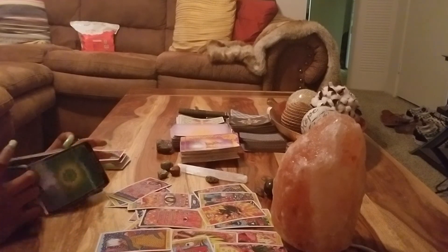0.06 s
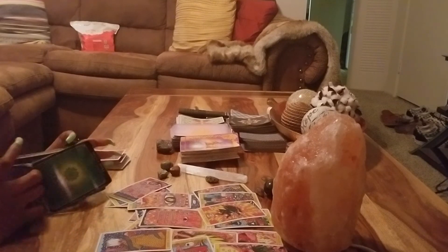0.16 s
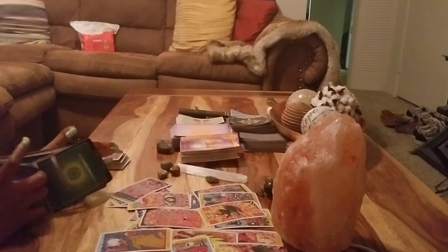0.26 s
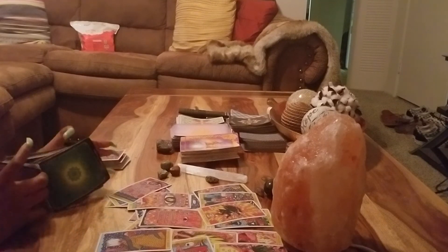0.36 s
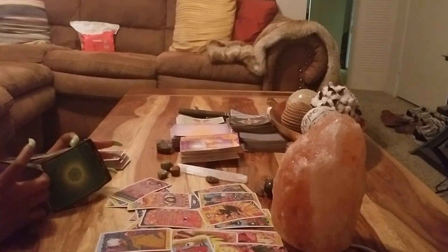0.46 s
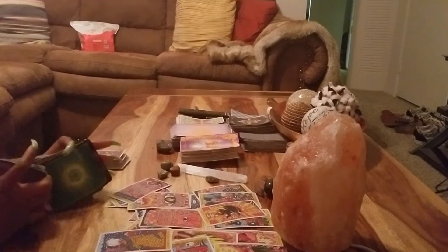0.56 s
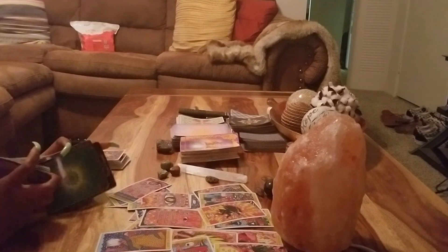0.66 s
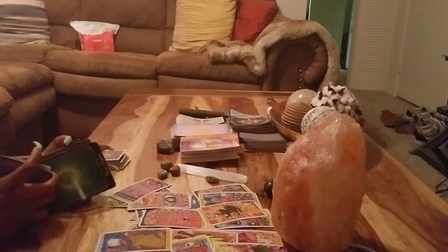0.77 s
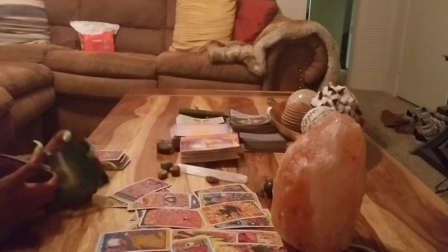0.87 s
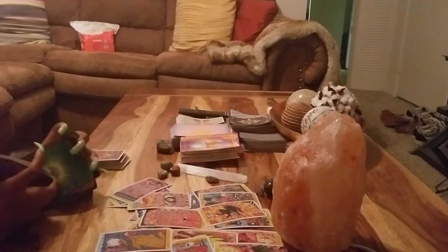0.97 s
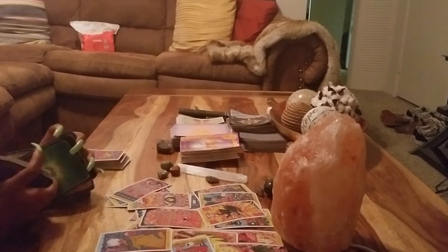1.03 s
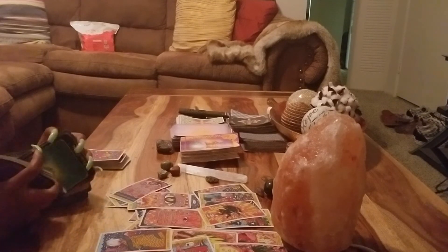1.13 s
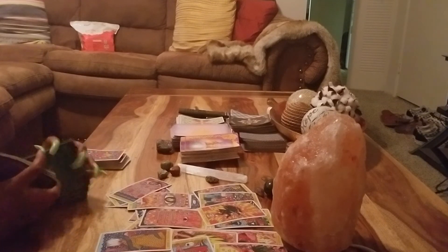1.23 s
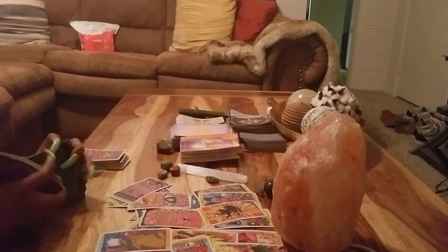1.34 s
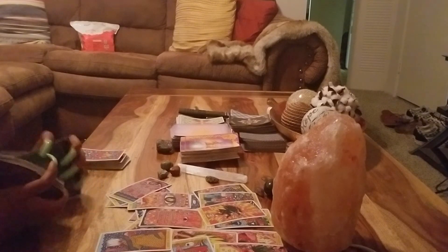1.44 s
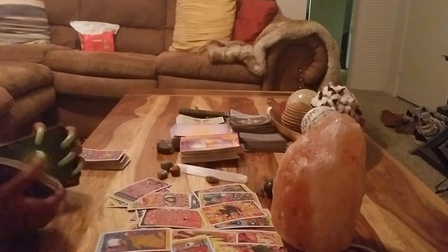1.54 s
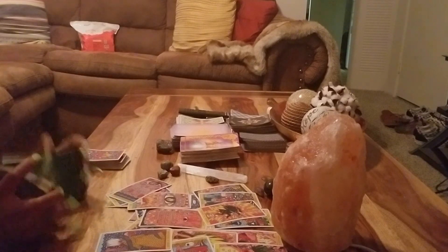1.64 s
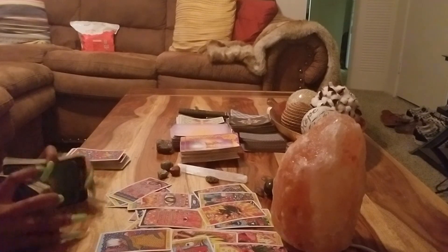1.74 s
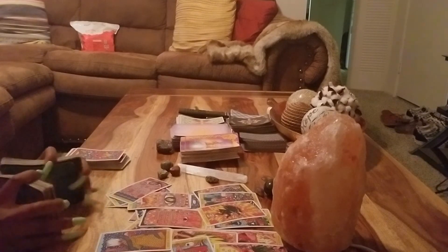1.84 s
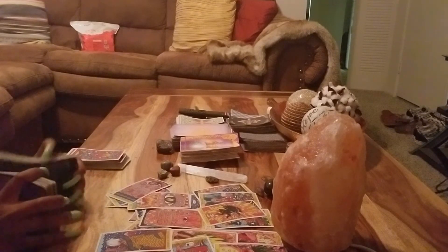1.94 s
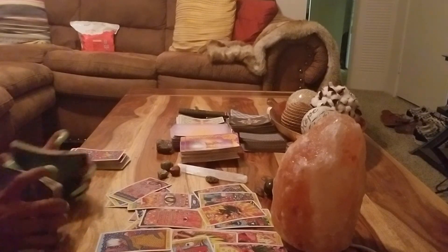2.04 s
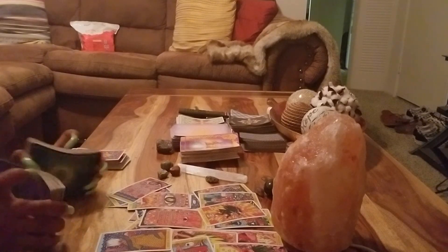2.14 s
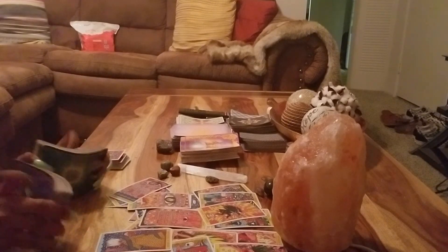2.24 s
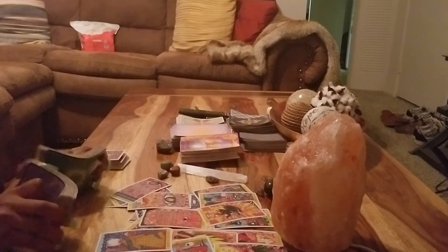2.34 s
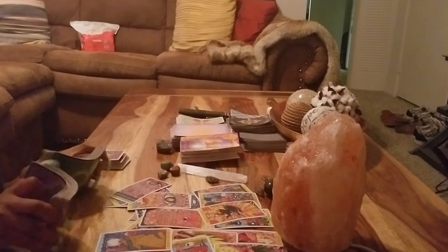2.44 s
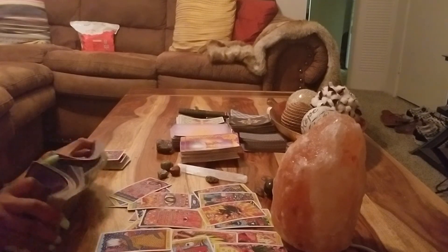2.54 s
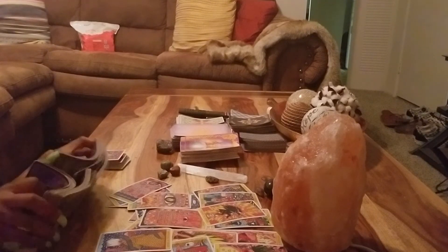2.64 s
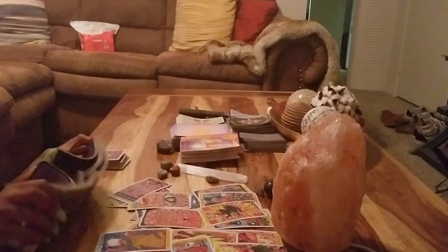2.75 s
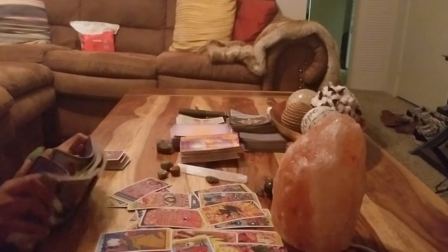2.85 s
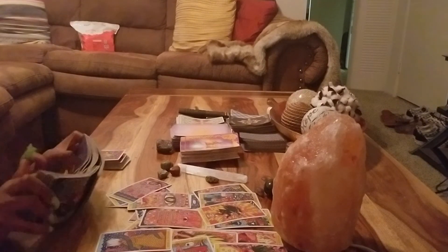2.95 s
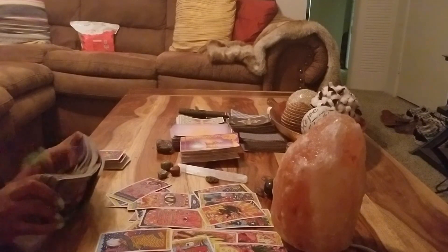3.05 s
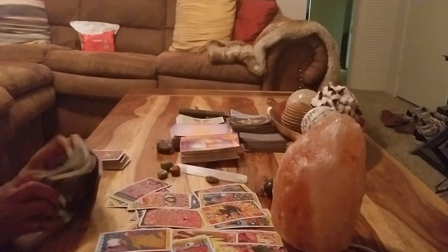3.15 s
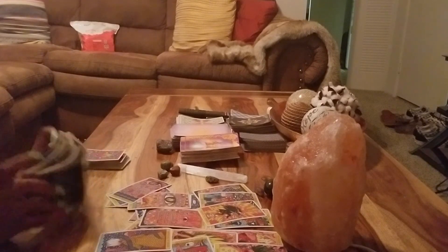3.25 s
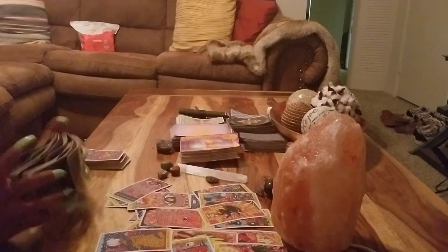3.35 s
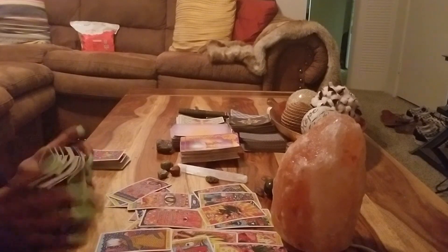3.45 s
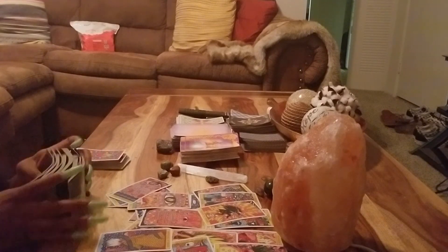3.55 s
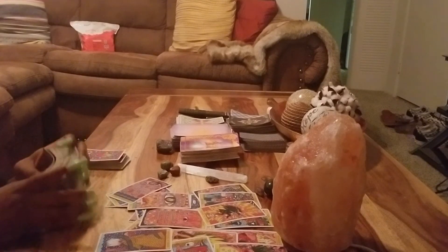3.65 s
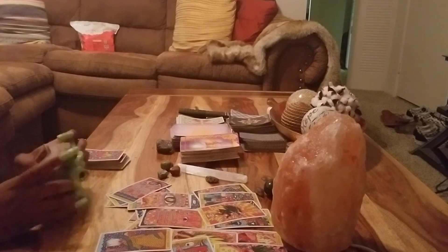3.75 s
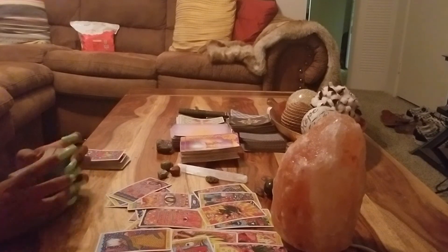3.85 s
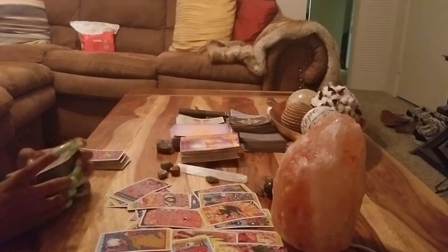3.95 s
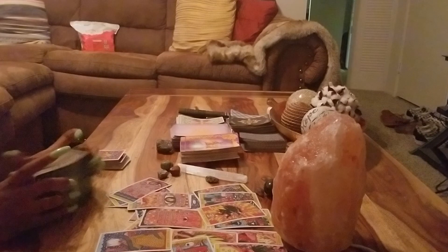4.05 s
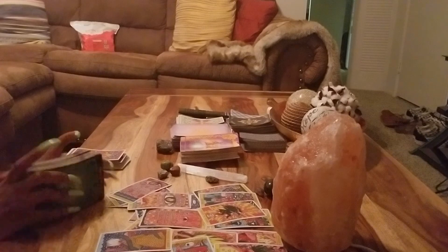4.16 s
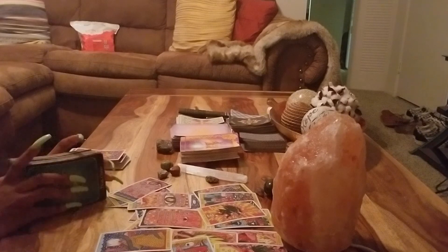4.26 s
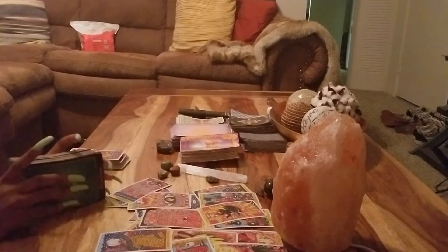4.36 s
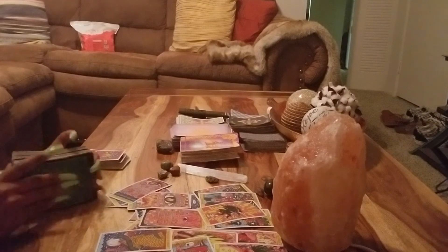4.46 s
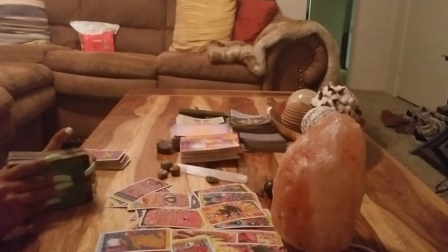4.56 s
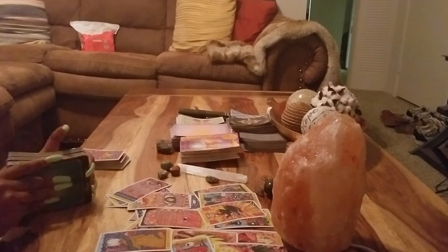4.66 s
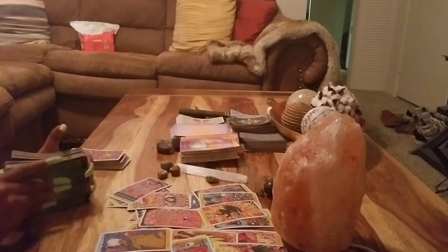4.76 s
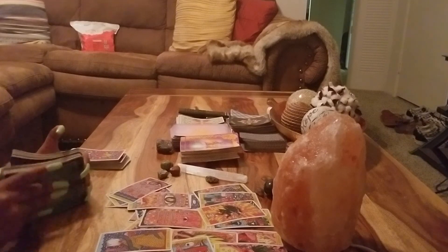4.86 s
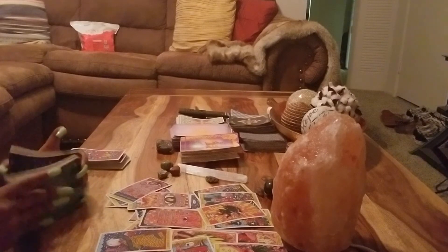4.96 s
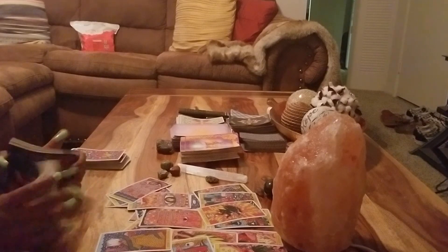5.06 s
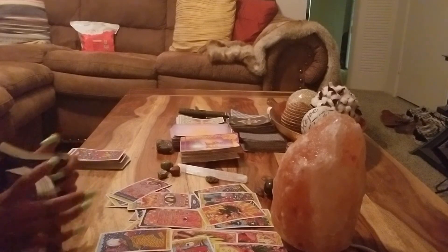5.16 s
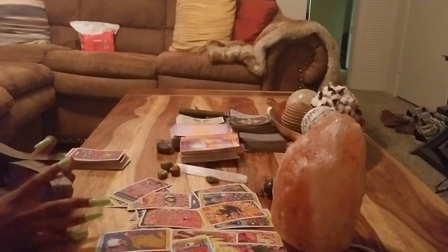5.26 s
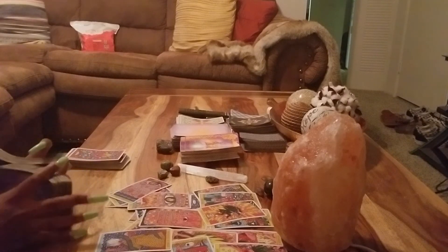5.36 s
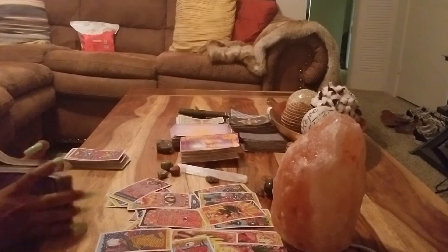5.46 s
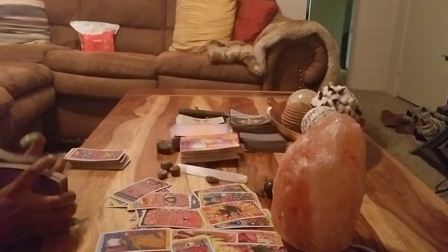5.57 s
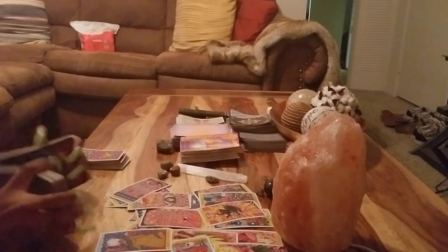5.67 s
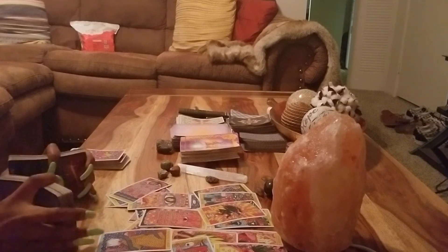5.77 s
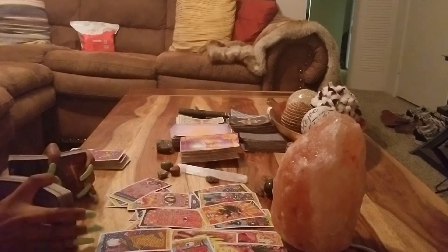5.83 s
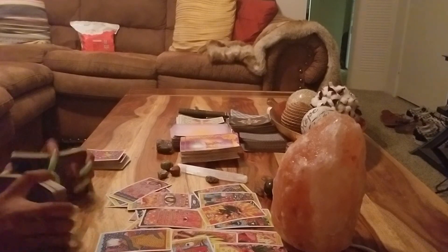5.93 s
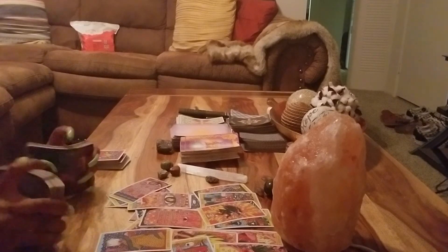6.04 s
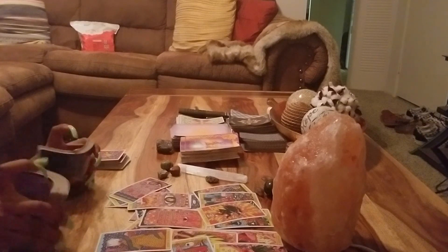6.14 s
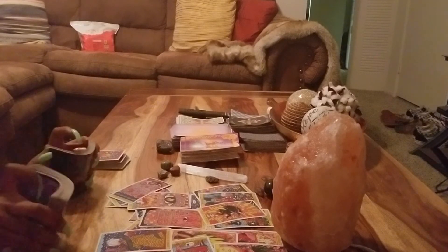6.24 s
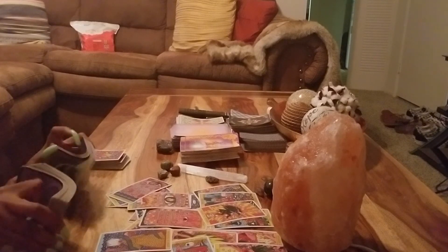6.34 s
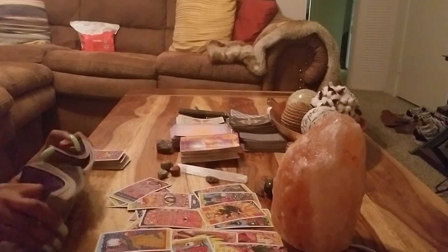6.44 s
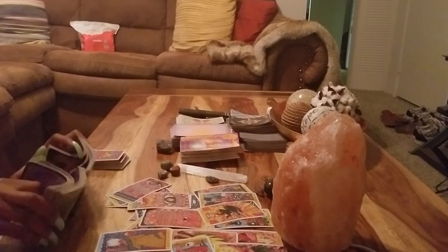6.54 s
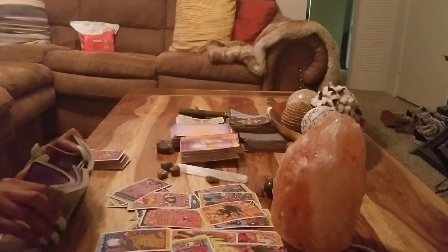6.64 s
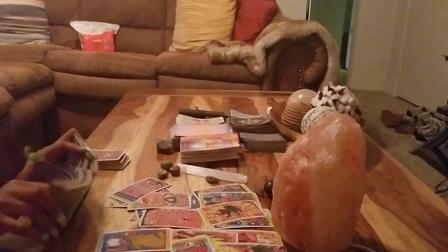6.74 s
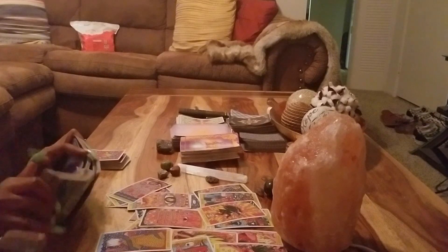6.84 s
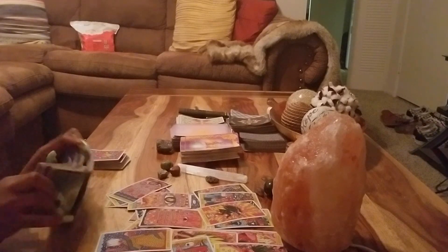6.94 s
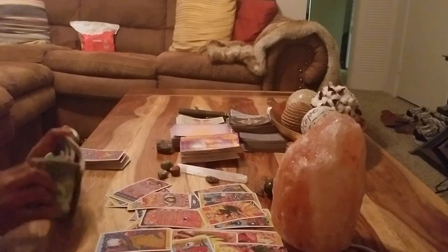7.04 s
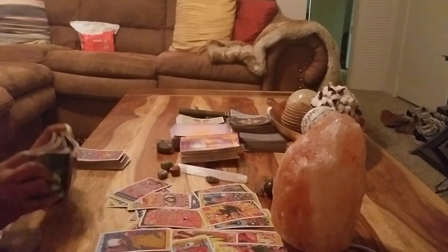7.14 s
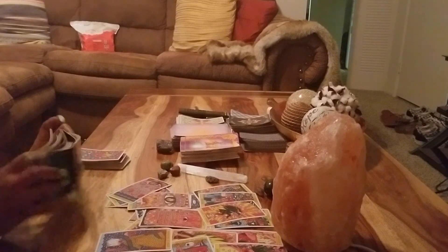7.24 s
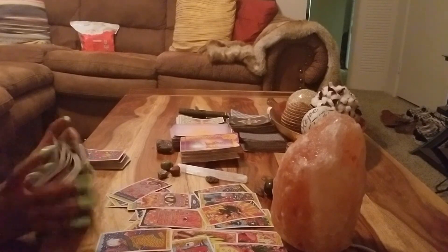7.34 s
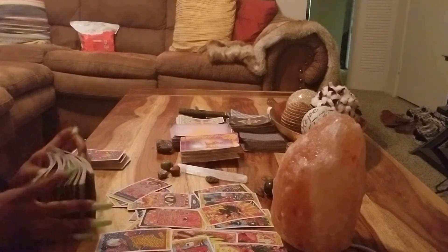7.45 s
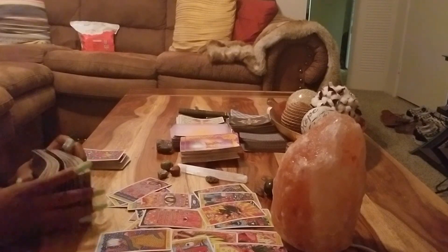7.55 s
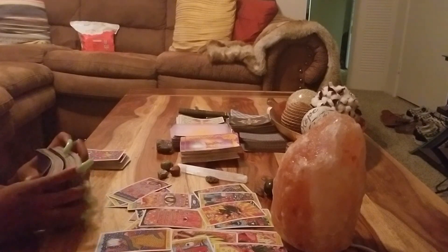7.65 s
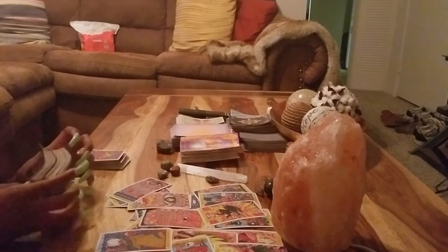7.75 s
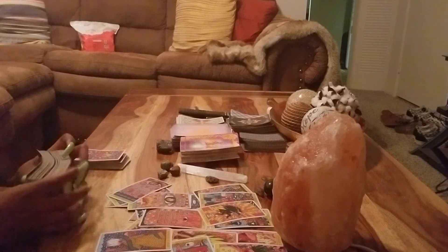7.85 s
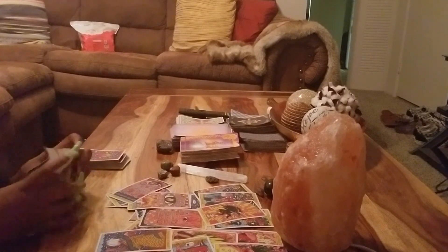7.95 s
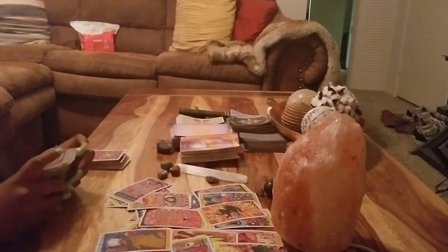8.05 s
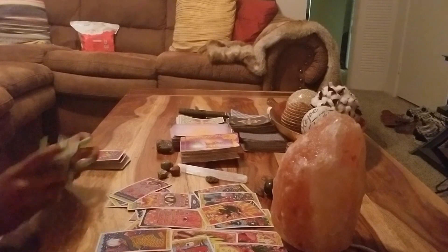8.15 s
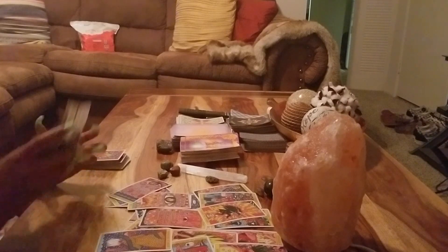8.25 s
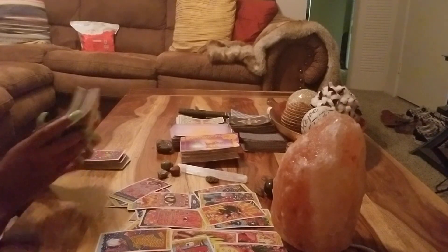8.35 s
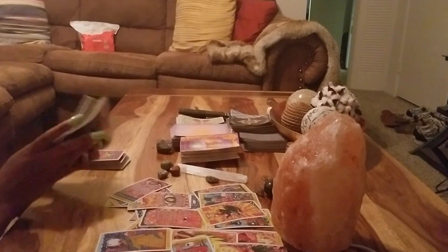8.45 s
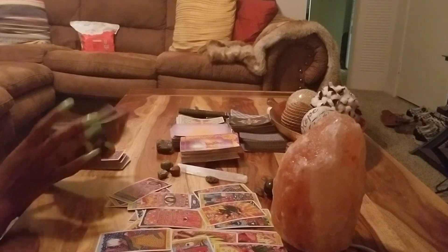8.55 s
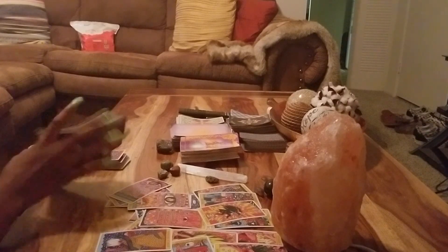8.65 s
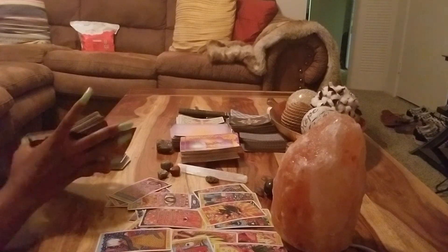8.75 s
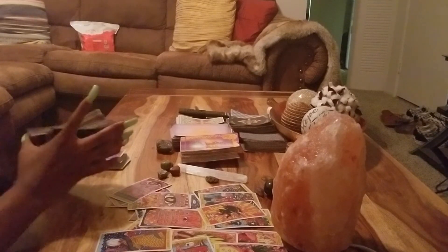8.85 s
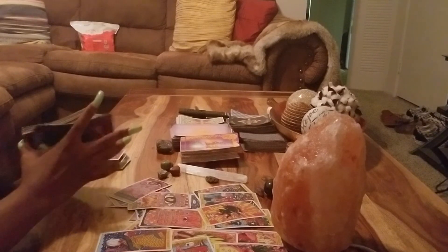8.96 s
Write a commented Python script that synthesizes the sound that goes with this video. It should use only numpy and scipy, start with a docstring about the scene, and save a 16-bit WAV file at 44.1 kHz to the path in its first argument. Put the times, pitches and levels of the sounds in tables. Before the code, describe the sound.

In a small, softly echoing living room, stiff cards are shuffled close to a stereo microphone over a low steady machine hum, a very faint high whine and still air. From 0 to 1.5 seconds faces rub softly with small ticks and dull pats. At about 1.65 a firm, bright slap lands as the deck is cut. From 2.4 to 2.95 a loud riffle snaps off the thumbs in uneven packets, crackling and thumping with a rustle. A firm slap at 3.4 and a duller one at 3.8 follow, amid sliding and clicks until about 5.5. Light slaps come near 5.7. A second riffle, generally thinner and crisper, with one strong early crack, runs from 6.2 to 6.75. Rubbing resumes, paired slaps land around 7.35, a papery scuff with bright ticks comes near 7.9, and faint slides and clicks fade toward 9.

```python
"""A deck of stiff cards is cut, riffled twice and squared up by hand over a wooden table, heard close up.
Cards snap off the thumbs in uneven packets, halves slap together, edges tick: each contact is a burst of
tiny noise impacts driving a resonant body. Faces slide as swelling noise peppered with small catches.
A small living room answers with early echoes and a soft tail, over a low steady hum, whine and still air."""
import sys
import numpy as np
from scipy import signal
from scipy.fft import rfft, irfft
from scipy.io import wavfile
from scipy.ndimage import uniform_filter1d

SR = 44100
rng = np.random.default_rng(int(sys.argv[2]) if len(sys.argv) > 2 else 0)


def digitize_waveform(pressure):
    """Quantize a signal to 16-bit integers and store it at the path in sys.argv[1].

    Rows of a 2-D input are taken as channels; values are limited to [-1, 1].
    """
    field = np.atleast_2d(pressure).T
    bounded = np.clip(field, -1, 1)
    quanta = np.round(bounded * 32767).astype(np.int16)
    wavfile.write(sys.argv[1], SR, quanta)


N = 396900  # samples, 9 s


def amp(db):
    """Decibels as a gain."""
    return 10 ** (np.asarray(db) / 20)


def evened(x):
    """The signal at an rms of one."""
    return x / np.sqrt(np.mean(x ** 2) + 1e-20)


def read(points, hz):
    """A spectrum joined by straight lines on a log-frequency axis."""
    f, value = np.transpose(points)
    return np.interp(np.log(hz + 1), np.log(f + 1), value)


def follow(points):
    """A level curve in dB as a gain for every sample."""
    return amp(np.interp(np.arange(N) / SR, *np.transpose(points)))


def add(mix, s, sound):
    """Mixes a sound in at time s."""
    part = mix[:, round(s * SR):][:, :sound.shape[1]]
    part += sound[:, :part.shape[1]]


def pair(x, likeness):
    """Blends two unrelated signals into a left and right as alike at each frequency as the table asks."""
    a, b = rfft(x)
    same = np.clip(read(likeness, np.fft.rfftfreq(x.shape[1], 1 / SR)), 0, 1)
    mid = a * np.sqrt((1 + same) / 2)
    side = b * np.sqrt((1 - same) / 2)
    return irfft(np.array([mid + side, mid - side]), x.shape[1])


# Resonances that all the card sounds share.
# Each row: centre in Hz, width in Hz, boost in dB before the ring factor.
RESONANCES = [(308.5, 38, 1), (463, 79, 7), (711, 110, 6), (1290, 97, 8.5), (2280, 47, 2), (3113, 420, 3.5)]


def card_body(colour, ring, bass_db=0, treble_db=0, flex=(1, 0), size=2048):
    """Causal response of the cards: a broad colour, tilted at both ends, with a few short resonances."""
    hz = abs(np.fft.fftfreq(size, 1 / SR))
    resonances_db = sum(boost / (1 + (2 * (hz - f) / width) ** 2) for f, width, boost in RESONANCES)
    db = read(colour, hz) + ring * resonances_db
    db = db + bass_db * read([(550, 1.0), (1200, 0.043)], hz)
    db = db + treble_db * read([(2700, 0), (6500, 1.0)], hz)
    flex_hz, flex_db = flex  # the bent card's own note, broad because card is heavily damped
    db = db + flex_db / (1 + ((hz / flex_hz - 1) / .14) ** 2)
    minimum_phase = np.exp(np.conj(signal.hilbert(np.log(amp(db)))))
    return np.fft.ifft(minimum_phase).real


def bent(colour, ring, bend, cup, bass_db, treble_db, flex_db, flat_hz=850, bend_octaves=2.7):
    """The body of one packet: bending raises its note, and a cupped hand strengthens the shared resonances."""
    boost = ring * (1 + cup / 2)
    note_hz = flat_hz * 2 ** (bend_octaves * bend)
    return card_body(colour, boost, bass_db, treble_db, (note_hz, flex_db))


# Likeness of the two microphones for card contacts. Each row: frequency in Hz, likeness from 0 to 1.
CONTACT_LIKENESS = [(270, 1), (640, 0.4), (1300, 1), (2500, 0.2), (8000, 0.4)]


def contact(s, body, level_db, contact_s, grain_db, scrape_db, scrape_s=0.0073, size=4096):
    """A card scrapes up to its release, then many tiny impacts drive the body; returns start and sound."""
    lead_s = size / SR / 4  # room for the scrape before the release
    t = np.arange(size) / SR - lead_s
    u = np.maximum(t, 0) / max(contact_s, 1e-4)
    release = u ** 0.84 * np.exp(-u)
    scrape = amp(scrape_db) * np.exp(-abs(t) / scrape_s)
    clumps = amp(grain_db * evened(uniform_filter1d(rng.standard_normal(size), size=14)))
    noise = rng.standard_normal((2, size))
    impacts = pair((release + scrape) * clumps * noise, CONTACT_LIKENESS)
    sound = signal.fftconvolve(impacts, body[None], axes=1)
    over_10_ms = np.sqrt(SR / 100 / sound.shape[1])  # the level counts the energy as spread over 10 ms
    return s - lead_s, amp(level_db) * evened(sound) * over_10_ms


# A loose card slips off ahead: how early at most in seconds, how strong in dB against the table's level.
SLIP_AHEAD_S, SLIP_DB = .016, -14
# Packets of cards snapping off the thumbs. Each row: release in seconds, level in dB before gain_db,
# treble tilt in dB, contact time in seconds before the stretch.
PACKET_SNAPS = [(2.42, -33.5, 3.5, 0.0018), (2.482, -27.5, 2.5, 0.0019), (2.495, -18, 2.5, 0.0053),
                (2.543, -25, -5, 0.0015), (2.603, -27.5, 2.5, .005), (2.613, -17.5, -2, 0.0026),
                (2.626, -18, -3, 0.0021), (2.646, -16.5, -9, 0.00094), (2.703, -24, 4, 0.00095),
                (2.7253, -12.5, -4, .0036), (2.764, -23, 0, 0.0024), (2.794, -16.5, -7, 0.004),
                (2.829, -20, 8.5, 0.0016), (2.84, -18.5, -4.5, 0.0033), (2.855, -17.5, 0.5, 0.0016),
                (2.874, -16, 1, 0.0022), (2.944, -23.5, 3, 0.002), (6.224, -37, 10.5, 0.0054),
                (6.287, -26, 9, 0.0037), (6.31, -25.5, 2, 0.0014), (6.322, -12, 1.5, 0.00093),
                (6.341, -20.5, 5.5, 0.0017), (6.424, -20.5, 8, 0.0041), (6.45, -26, -8, 0.0029),
                (6.486, -22, 0, 0.0028), (6.501, -23, 3.5, 0.0014), (6.519, -16.5, 13, 0.0018),
                (6.599, -18, 0.5, 0.0031), (6.626, -25, -0.5, 0.0012), (6.70, -20, 3, 0.0034),
                (6.733, -22.5, -3, 0.0029), (6.749, -28.5, 16.5, .003)]
# Colour of a snap. Each row: frequency in Hz, level in dB.
SNAP_SPECTRUM = [(40, -24), (100, -4.5), (250, -3), (800, -7.5), (1500, 0.5), (2500, -6.5), (3500, -5.5),
                 (5000, -10), (7000, -11.5), (8500, -20), (11500, -18.5), (16000, -26.5)]


def snaps(ring=1, gain_db=1, stretch=1.2, grain_db=1.5, scrape_db=-24, flex_db=3.5,
          bass_db=-2, thick_db=3.0, stiffening=0.39):
    """Thick packets let go slowly and thump; hard flicks lose bass against crack; a loose card slips ahead."""
    usual_db, usual_s = -21, .002  # level and contact time that leave the bass at bass_db
    out = np.zeros((2, N))
    chances = rng.random((len(PACKET_SNAPS), 3))
    for (s, db, treble_db, contact_s), (bend, cup, early) in zip(PACKET_SNAPS, chances):
        thump_db = bass_db + thick_db * np.log2(contact_s / usual_s)
        thump_db = thump_db - stiffening * (db - usual_db)
        body = bent(SNAP_SPECTRUM, ring, bend, cup, thump_db, treble_db, flex_db)
        add(out, *contact(s, body, db + gain_db, contact_s * stretch, grain_db, scrape_db))
        slip_s = s - SLIP_AHEAD_S * (1 + early) / 2
        add(out, *contact(slip_s, body, db + SLIP_DB, contact_s, grain_db, scrape_db))
    return out


# A slap above this table level in dB is firm: one corner touches first, softer and duller than the face.
FIRM_DB, CORNER_LEAD_S = -22, .012
CORNER_DB, CORNER_BASS_DB, CORNER_TREBLE_DB = -8, 3.5, -4  # against the face
# Parts of the deck landing flat on each other or on the palm.
# Each row: landing in seconds, level in dB before gain_db, bass tilt in dB, treble tilt in dB.
FLAT_LANDINGS = [(.357, -49.5, 8.5, 10), (0.976, -42.5, 5, -21), (1.144, -50, -4, -2),
                 (1.171, -44.5, 1, -25), (1.2, -42.5, 0, 9.5), (1.649, -19, -1.5, 13),
                 (1.695, -28, -6, -16), (3.426, -19.5, -5.5, 9.5), (3.61, -39, 0.5, -8),
                 (3.818, -27, 3, -11), (5.25, -43.5, 15, 3.5), (5.698, -38, 17, -4.5), (5.716, -27, 2.5, 1),
                 (5.744, -31.5, 0, 9), (6.207, -39.5, 32, 10), (6.463, -30.5, 27, 4),
                 (7.34, -27.5, -4.5, 7), (7.378, -28, -4.5, -3.5), (7.713, -41, 9.5, -16),
                 (7.751, -40, 3, -45)]
# Colour of a slap. Each row: frequency in Hz, level in dB.
SLAP_SPECTRUM = [(50, -37), (130, 5.5), (220, -0.5), (450, -6.5), (1500, -5), (2800, -8), (5000, -22),
                 (7300, -25.5), (9000, -37.5), (16000, -47)]


def slaps(ring=0.87, gain_db=4.0, contact_s=0.0054, halving_db=36, grain_db=1.5, scrape_db=-27.0,
          flex_db=9.0):
    """The harder a packet lands, the shorter the contact; a firm one comes down corner first."""
    out = np.zeros((2, N))
    chances = rng.random((len(FLAT_LANDINGS), 2))
    for (s, db, bass_db, treble_db), (bend, cup) in zip(FLAT_LANDINGS, chances):
        landing_s = contact_s * .5 ** ((db - FIRM_DB) / halving_db)
        face = bent(SLAP_SPECTRUM, ring, bend, cup, bass_db, treble_db, flex_db)
        add(out, *contact(s, face, db + gain_db, landing_s, grain_db, scrape_db))
        if db > FIRM_DB:
            corner = bent(SLAP_SPECTRUM, ring, bend, cup, bass_db + CORNER_BASS_DB,
                          treble_db + CORNER_TREBLE_DB, flex_db)
            corner_db = db + gain_db + CORNER_DB
            add(out, *contact(s - CORNER_LEAD_S, corner, corner_db, landing_s, grain_db, scrape_db))
    return out


# Card edges and fingernails catching. Each row: time in seconds, level in dB before gain_db, note in Hz.
EDGE_CATCHES = [(.5118, -38, 1930), (.582, -42, 2350), (.6217, -41.5, 2320), (.9099, -38, 1880),
                (1.2774, -48.5, 4150), (2.2595, -46.5, 5630), (2.387, -40.5, 2800), (3.1088, -38, 2170),
                (3.2986, -41, 2350), (3.3788, -43, 5000), (3.7036, -44.5, 1300), (3.89, -41, 7300),
                (3.9882, -39.5, 1290), (4.0348, -39.5, 1140), (4.841, -41, 1850), (4.85, -42, 2620),
                (4.9896, -46.5, 7200), (5.0202, -39.5, 1220), (5.2623, -41.5, 5300), (7.759, -56, 1280),
                (7.8093, -42.5, 1250), (7.9383, -34, 7800), (7.9654, -38, 7240), (8.003, -38, 1330),
                (8.1804, -41.5, 6300), (8.2444, -46.5, 8050), (8.263, -42.5, 11200), (8.44, -48, 3500),
                (8.501, -49.5, 3640), (8.6309, -54, 2970)]
# Colour of a tick. Each row: frequency in Hz, level in dB.
TICK_SPECTRUM = [(60, -28.5), (150, -4.5), (800, -9.5), (1400, -2), (2700, -4), (4500, -1), (7000, -0.5),
                 (9000, -6.5), (13000, -3), (16000, -14)]


def ticks(ring=0.55, gain_db=1, contact_s=0.0011, grain_db=-2.5, scrape_db=-24, note_db=8,
          even_hz=5200, rise_db=6):
    """Single edges catch and let go: short, thin clicks, brighter by rise_db for each octave of their note."""
    out = np.zeros((2, N))
    for s, db, note_hz in [*EDGE_CATCHES, *stray_ticks()]:
        treble_db = rise_db * np.log2(note_hz / even_hz)
        body = card_body(TICK_SPECTRUM, ring, 0, treble_db, (note_hz, note_db))
        add(out, *contact(s, body, db + gain_db, contact_s, grain_db, scrape_db))
    return out


def stray_ticks(over_db=5, spread_db=4, middle_hz=3800, count=40):
    """Weak catches at random moments, following the strength of the rubbing; gives rows like EDGE_CATCHES."""
    when, size, stiffness = rng.random((count, 3)).T
    at = (np.arange(count) + when) / count * N / SR  # one in each equal slot
    level_db = 20 * np.log10(rubbing(at) + 1e-9) + over_db + spread_db * (2 * size - 1)
    note_hz = middle_hz * 2 ** (2 * stiffness - 1)
    return zip(at, level_db, note_hz)


# Card faces rubbing while the deck is turned, pushed together and squared, one list for each spell.
# Each row: time in seconds, level in dB before the resting level is taken off.
RUBBING_SPELLS = [
    [(0.0, -58), (0.184, -62.5), (0.336, -69.5), (0.448, -74), (0.568, -68), (0.746, -61), (1.178, -64.5),
     (1.406, -70.5), (1.55, -71)],
    [(3.0, -71), (3.11, -55), (3.54, -55.5), (3.9, -56), (4.24, -66.5), (4.74, -66), (4.9, -61.5),
     (5.25, -60), (5.51, -65), (5.6, -67)],
    [(6.85, -59.5), (7.11, -62), (7.43, -58.5), (7.75, -62), (7.9, -54.5), (8.02, -61), (8.2, -68.5),
     (8.4, -62.5), (8.72, -61.5), (9.0, -65)],
]


def rubbing(t, rest_db=-67.5, fade_s=.1):
    """How strongly the faces rub at these times; between the spells of handling they rest in silence."""
    spells = [[(rows[0][0] - fade_s, rest_db), *rows, (rows[-1][0] + fade_s, rest_db)]
              for rows in RUBBING_SPELLS]
    level_db = np.interp(t, *np.concatenate(spells).T)
    return np.maximum(amp(level_db) - amp(rest_db), 0)


# Quick strokes, the longest being the rustle of the halves interleaving.
# Each row: middle in seconds, length in seconds, peak level in dB before the swell.
QUICK_STROKES = [(0.554, 0.08, -44.5), (2.018, 0.11, -62.5), (2.478, 0.078, -44.5), (2.83, 0.23, -30.5),
                 (3.092, 0.052, -42.5), (3.614, 0.04, -51.5), (4.205, 0.095, -58), (5.987, 0.078, -58),
                 (6.536, 0.23, -39), (7.108, 0.082, -47), (7.535, 0.044, -50.5), (7.99, .06, -48)]
# Colour of sliding. Each row: frequency in Hz, level in dB.
SLIDE_SPECTRUM = [(100, -8.5), (600, -9), (1300, 0), (3000, -1.5), (5000, -3.5), (7000, -2), (9000, -11.5),
                  (13000, -9.5), (16000, -20)]
# Likeness of the two microphones for sliding, room and still air.
# Each row: frequency in Hz, likeness from 0 to 1.
DIFFUSE_LIKENESS = [(130, .99), (290, 0.88), (640, 0.39), (1400, 0.027)]


def slide(ring=0.94, catches_per_s=300, catch_db=-1, spread_db=3, catch_s=0.00077, uneven_db=4, rubbing_db=5):
    """Friction: each stroke swells and fades unevenly, peppered with tiny catches of the edges."""
    t = np.arange(N) / SR
    strokes = sum(amp(db) * np.exp(-(2 * (t - s) / length) ** 2) for s, length, db in QUICK_STROKES)
    speed = amp(rubbing_db) * rubbing(t) + strokes
    swell = amp(uneven_db * evened(uniform_filter1d(rng.standard_normal(N), size=700)))
    struck = rng.random(N) < catches_per_s / SR
    sizes = struck * amp(spread_db * np.minimum(rng.exponential(1, N), 4))
    catches = signal.lfilter([1], [1, -np.exp(-1 / (catch_s * SR))], sizes)  # each dies away
    grit = swell + amp(catch_db) * evened(catches)
    rub = pair(grit * rng.standard_normal((2, N)), DIFFUSE_LIKENESS)
    body = card_body(SLIDE_SPECTRUM, ring)
    return speed * evened(signal.oaconvolve(rub, body[None], axes=1)[:, :N])


# The room's decay. Each row: frequency in Hz, time to fall by 60 dB in seconds.
ROOM_DECAY = [(300, 0.34), (1200, 0.28), (2200, 0.34), (6000, 0.26), (15000, 0.24)]


def room_response(early_db=-9, tail_db=-7.5, size=22050):
    """Sparse echoes from the hands and table, then a soft tail from walls and sofa."""
    early_s, gap_s = .008, .011  # life of the first echoes; time until the walls answer
    t = np.arange(size) / SR
    taps = rng.standard_normal((2, size)) * (rng.random((2, size)) < 3500 / SR)
    early = taps * (t > .002) * np.exp(-t / early_s)
    onset = 1 - np.exp(-(t / gap_s) ** 2)
    hz, at, z = signal.stft(rng.standard_normal((2, size)) * onset, SR, nperseg=256)
    absorbed_db = read([(200, 2.5), (2200, 0), (6000, 0), (12000, -2.5)], hz)[:, None]
    decay_db = -60 * at / read(ROOM_DECAY, hz)[:, None]
    tail = signal.istft(z * amp(absorbed_db + decay_db), SR, nperseg=256)[1][:, :size]
    both = amp(early_db) * evened(early) + amp(tail_db) * evened(tail)
    return pair(both, DIFFUSE_LIKENESS) / np.sqrt(size)


def room(x, moves_per_s=3.7, count=5):
    """The echo pattern crossfades from one response to the next in a steady cycle, as the hands move."""
    place = moves_per_s * count * np.arange(N) / SR
    nearness = [np.maximum(1 - abs((place - k) % count - 1), 0) for k in range(count)]
    return sum(signal.oaconvolve(x * np.sqrt(near), room_response(), axes=1)[:, :N] for near in nearness)


# Hum of a household machine. Each row: frequency in Hz, rms level in dB before waver and dip.
MACHINE_HUM = [(81.5, -48.5), (120, -48.5), (240, -69)]
# Still air of the room. Each row: frequency in Hz, relative level in dB per Hz.
STILL_AIR = [(30, -9), (180, -5), (450, -12.5), (700, -20.5), (1100, -29.5), (3000, -29), (5000, -32),
             (6700, -26), (9000, -38), (13000, -30), (16000, -35)]
AIR_DB = -58  # rms before the dip
# The background level dips around the second riffle and recovers. Each row: time in seconds, level in dB.
BACKGROUND_DIP = [(0, 0), (6.3, 0), (6.65, -5.5), (7.6, -3), (7.9, -0.5)]


def background(waver_db=-0.44):
    """Steady sine hum and a thin electrical whine, slightly wavering, over noise shaped as still air."""
    t = np.arange(N) / SR
    knots = np.linspace(0, t[-1], num=60)
    whine = (6255, -82)  # Hz, rms dB before waver and dip
    hum = 0
    for hz, db in [*MACHINE_HUM, whine]:
        waver = waver_db * np.interp(t, knots, rng.standard_normal(len(knots)))
        tone = np.sqrt(2) * np.sin(2 * np.pi * (hz * t + rng.random()))
        hum = hum + amp(db + waver) * tone
    air_gain = amp(read(STILL_AIR, np.fft.rfftfreq(N, 1 / SR)))
    air = irfft(rfft(rng.standard_normal((2, N))) * air_gain, N)
    return follow(BACKGROUND_DIP) * (hum + amp(AIR_DB) * evened(pair(air, DIFFUSE_LIKENESS)))


def scene(snap_echo_db=-.5, slap_echo_db=1.17, tick_echo_db=0.0):
    """The cards are heard directly and through the room, over their own sliding and the background."""
    packets, landings, edges = snaps(), slaps(), ticks()
    left, right = packets + landings + edges
    direct = np.array([np.roll(left, 5), right])  # the sound reaches the right microphone 5 samples sooner
    sent = amp(snap_echo_db) * packets + amp(slap_echo_db) * landings + amp(tick_echo_db) * edges
    return direct + room(sent) + slide() + background()


def record(dry):
    """The sharpest peaks are rounded off near full scale; then a steep lowpass sets the band limit."""
    edge_hz, ceiling = 16150, .9
    lowpass = signal.firwin(511, edge_hz, window=("kaiser", 9), fs=SR)
    rounded = dry / (1 + (dry / ceiling) ** 4) ** .25
    return signal.oaconvolve(rounded, lowpass[None], "same")


dry = scene()
out = record(dry)
digitize_waveform(out)
```